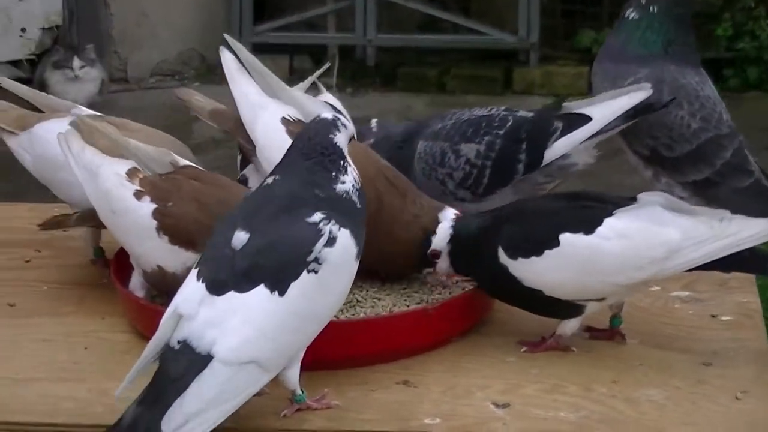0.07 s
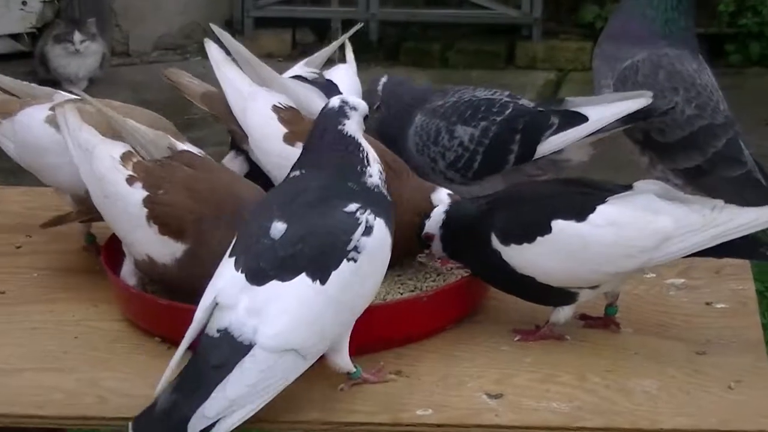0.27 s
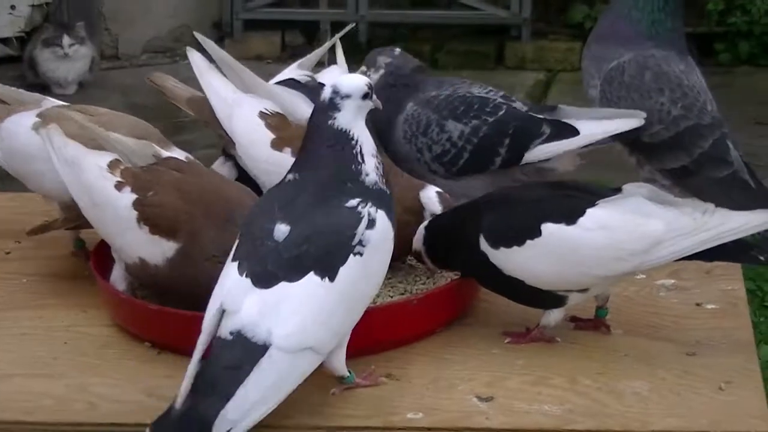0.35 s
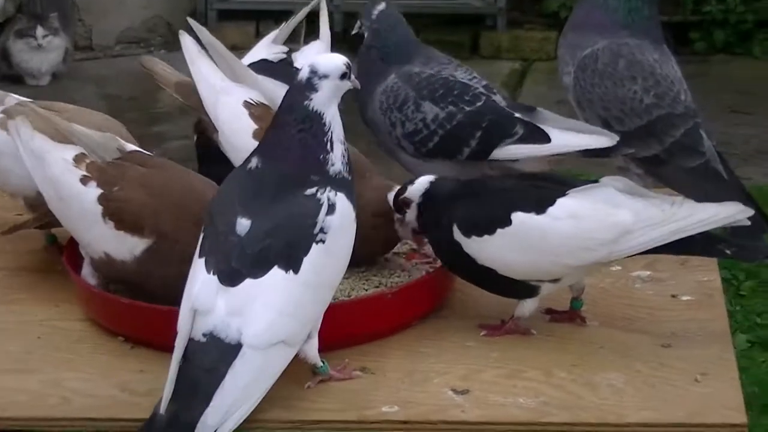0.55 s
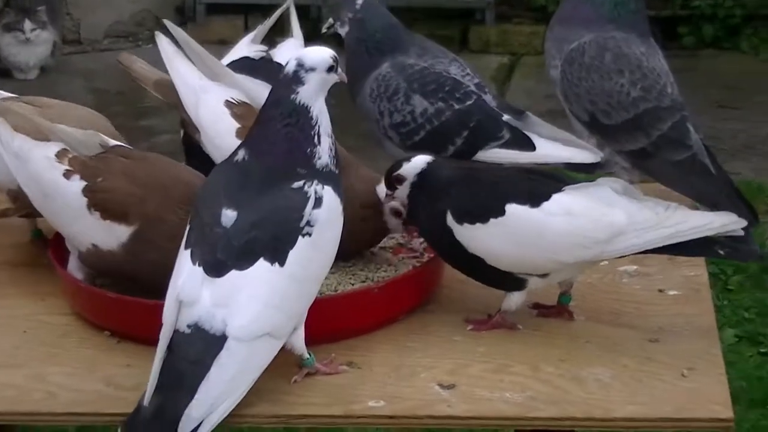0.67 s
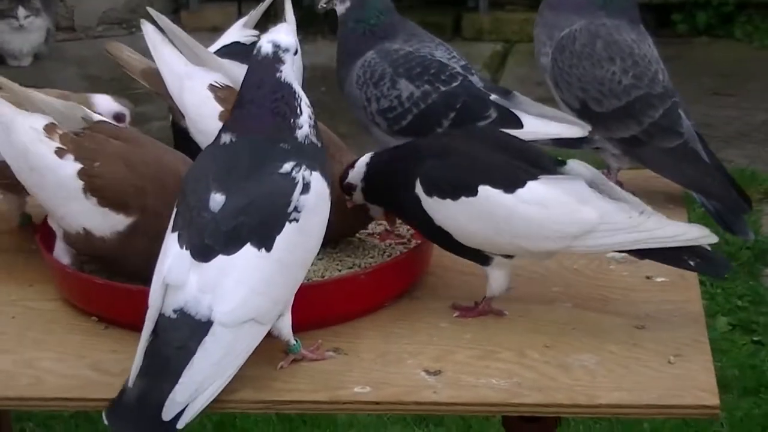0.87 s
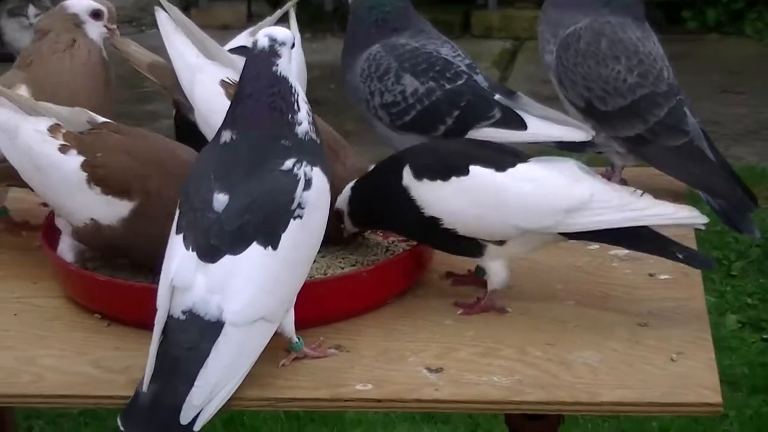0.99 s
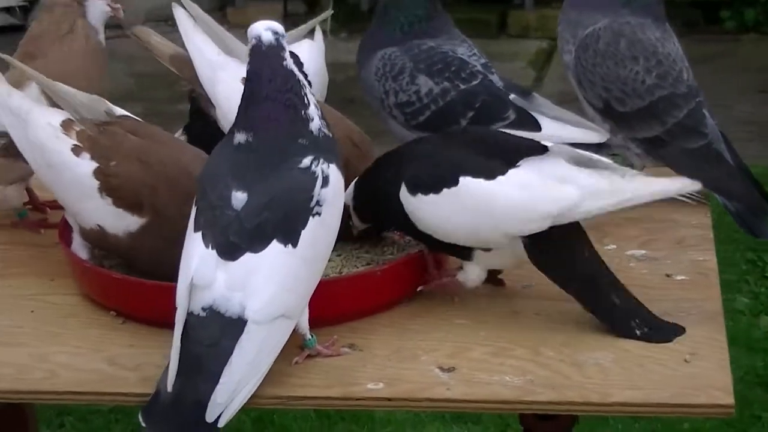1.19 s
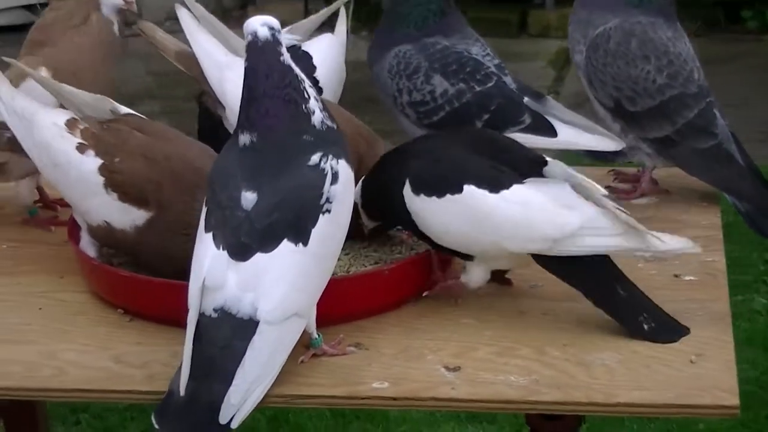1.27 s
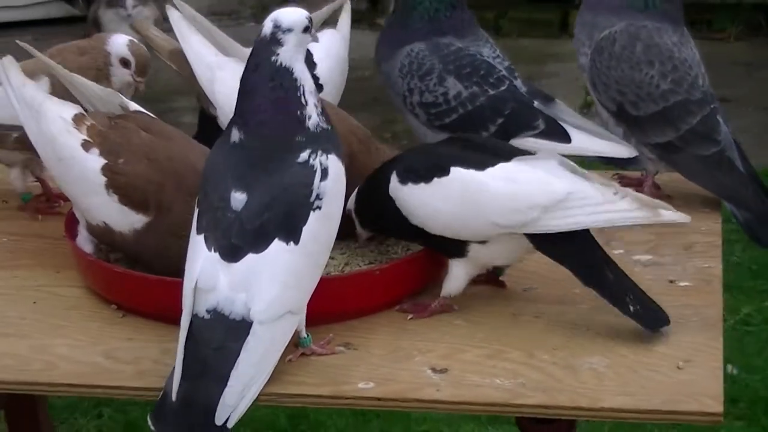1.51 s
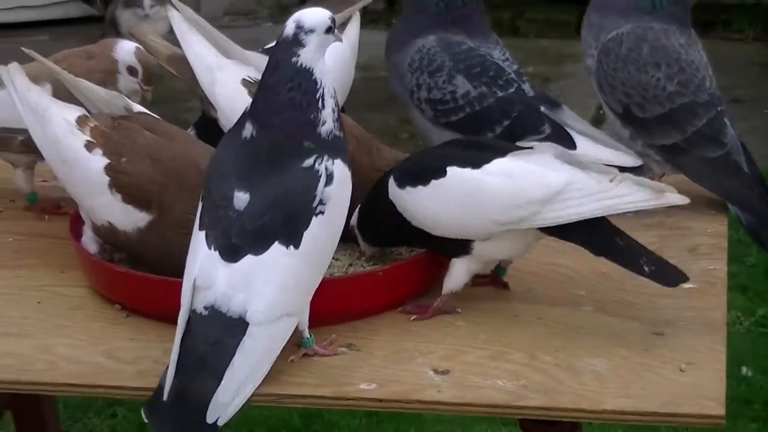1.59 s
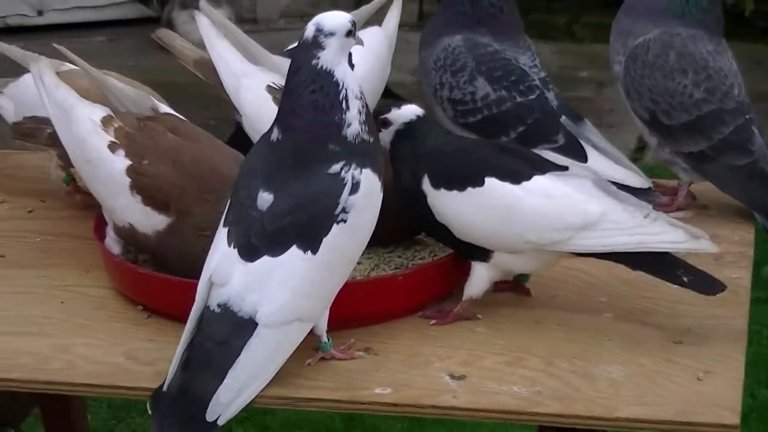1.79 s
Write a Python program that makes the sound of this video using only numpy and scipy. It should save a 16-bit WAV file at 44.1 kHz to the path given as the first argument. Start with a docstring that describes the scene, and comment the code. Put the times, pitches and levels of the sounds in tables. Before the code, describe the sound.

Pigeons peck grain from a plastic dish, with soft thuds, seed clicks and sharp knocks.

```python
"""Pigeons peck grain from a plastic dish on a plywood board, in the hush of a quiet yard.
First beaks thud softly through the grain into the board, and seeds click, slide and rustle.
Near 0.36, 0.97 and 1.29 s a beak knocks sharply on the bare dish and sets its modes ringing;
a flurry of seed clicks follows each time. Soft thuds and clicks go on to the end.
Throughout, the yard returns a faint short echo."""
import sys
import numpy as np
from scipy import signal
from scipy.fft import rfft, irfft
from scipy.io import wavfile

SR = 44100
rng = np.random.default_rng(int(sys.argv[2]) if len(sys.argv) > 2 else 0)


def master(y):
    """Save y as 16-bit WAV."""
    cut = np.clip(np.atleast_2d(y).T, -1, 1)
    pcm = np.round(cut * 32767)  # scale
    wavfile.write(sys.argv[1], SR, pcm.astype(np.int16))


N = 81585
HZ = np.fft.rfftfreq(4096, 1 / SR)  # frequency axis of every pulse spectrum

# Spectrum of the outdoor hush. Each row: frequency in Hz, relative spectral density in dB.
HUSH_SPECTRUM = [(25, -24), (60, -23), (140, -25), (200, -16.5), (300, -10.5), (450, -3), (650, -1),
                 (900, 1), (1350, -2.5), (1900, -2), (2600, -5), (4000, -7.5), (6000, -14.5), (9500, -18),
                 (12000, -27), (15500, -34.5)]
# Likeness of the hush in the two ears. Each row: frequency in Hz, correlation from 0 to 1.
HUSH_CORRELATION = [(50, 0), (150, 0.3), (400, 0.61), (1000, 0.53), (4000, 0.78), (10000, 1)]
HUSH_DB, HUSH_SWELL_DB = -62, -1.5

# Reverberation of the yard. Each row: frequency in Hz, time to decay by 60 dB in seconds.
YARD_T60 = [(250, 0.22), (900, 0.2), (2500, .2), (6000, 0.16), (14000, 0.048)]
YARD_DB, YARD_WIDTH, BOARD_ECHO_DB = -16.5, 0.26, 3
SIDE_DB, SIDE_DELAY_S = -20.5, .0006

# Grain sliding under beaks and feet. Each row: start in seconds, length in seconds, level in dB,
# centre frequency in Hz.
GRAIN_SLIDES = [(0.054, 0.023, -56, 4460), (.075, 0.08, -63.5, 3200), (0.194, .03, -47.5, 3900),
                (0.306, 0.044, -56, 5400), (0.434, .016, -60, 6000), (0.476, .035, -57, 3500),
                (0.522, .02, -54, 2000), (0.615, 0.022, -61.5, 5000), (0.778, 0.028, -64.5, 6000),
                (0.809, .05, -50, 3900), (0.864, 0.037, -53.5, 4870), (0.979, 0.043, -55, 4000),
                (1.040, 0.028, -47, 4200), (1.065, 0.012, -51, 9000), (1.089, 0.058, -59.5, 4500),
                (1.14, 0.034, -59, 4500), (1.178, 0.069, -61, 5000), (1.3, 0.034, -43, 3160),
                (1.43, 0.027, -59, 4460), (1.577, 0.031, -55, 5000), (1.641, 0.019, -55, 4540),
                (1.698, 0.043, -62, 6000), (1.79, 0.014, -59, 5500)]
RUSTLE_OCTAVES, GRAINS_PER_S, GRAIN_SPREAD_DB = 0.95, 3500, 5
STIR_PER_S, STIR_DB, STIR_HZ = 130, -72.5, 6000  # stray seeds shifting all the time

# Skids of a beak or claw. Each row: start in seconds, length in seconds, level in dB,
# resonance in Hz, half-width of the resonance in Hz.
SKID_STROKES = [(.086, 0.015, -57, 7160, 2200), (0.093, 0.023, -53.5, 6700, 2400),
                (.362, 0.028, -48, 2230, 450), (0.367, .03, -43.5, 3300, 450),
                (0.388, 0.036, -50, 3300, 400), (1.306, .045, -52, 2280, 650),
                (1.512, 0.027, -53.5, 7400, 2000), (1.517, .018, -58, 4480, 250),
                (1.590, .028, -65, 8900, 300)]
SLIPS_PER_S = 14000

# Single seeds snapped up or dropped. Each row: start in seconds, level in dB, centre frequency in Hz.
SEED_CLICKS = [(.0417, -53, 7000), (.0540, -36.5, 3977), (.1715, -33, 6940), (.1740, -46, 6000),
               (0.1964, -26.5, 8800), (0.201, -34, 7500), (0.2078, -35, 5500), (0.367, -29, 4470),
               (0.3714, -31, 7000), (.3742, -34, 8000), (0.393, -32.5, 8400), (0.458, -40, 7000),
               (0.5194, -25, 6740), (0.5202, -25.5, 4560), (0.524, -35, 7000), (0.618, -42, 7000),
               (.6367, -37.5, 10000), (.8165, -47, 6000), (.8228, -42, 10000), (.8305, -37, 6000),
               (.8328, -33, 5470), (.8390, -38, 7000), (.8760, -38.5, 6700), (.8933, -32.5, 5340),
               (.9658, -41, 12000), (0.9737, -18, 6000), (0.9769, -17.5, 7500), (0.978, -11, 7800),
               (0.9767, -28, 5450), (0.981, -25.5, 4970), (.9854, -28, 6500), (1.003, -40, 6500),
               (1.0412, -31.5, 6100), (1.078, -43, 9000), (1.0920, -28.5, 9000), (1.0930, -29.5, 6000),
               (1.1035, -29.5, 5470), (1.1195, -44, 9000), (1.1552, -42, 8500), (1.2982, -28, 8000),
               (1.302, -26, 7100), (1.3048, -17.5, 8300), (1.3044, -37, 5470), (1.309, -33, 5000),
               (1.3130, -29, 6000), (1.323, -31, 6600), (1.4627, -38, 6350), (1.5815, -31.5, 9100),
               (1.6362, -43, 6500), (1.6408, -34, 6000), (1.6510, -29, 6500), (1.6537, -38, 7500),
               (1.6927, -37, 6000), (1.7005, -31, 5500), (1.7565, -44, 7500), (1.793, -46, 8040),
               (1.821, -44, 8000), (1.8381, -39, 6500), (1.8427, -34.5, 7000)]
SEED_OCTAVES, SEED_RING_S, SEED_RING_SHARE, SEED_TOP_HZ = 0.79, 0.0012, 0.66, 12000

# Response of the plywood to a blow. Each row: frequency in Hz, relative level in dB.
BOARD_SPECTRUM = [(60, -38), (150, -26), (260, -11), (450, -5.5), (680, 1.5), (1000, 1), (1400, -5.5),
                  (2100, -5), (3500, -18), (8000, -41), (16000, -55)]
# Pecks through the grain into the board. Each row: start in seconds, level in dB, spectral tilt in dB
# per octave, pitch of the struck spot in Hz, level of its ring relative to the peck in dB.
BOARD_PECKS = [(.0520, -39, -.5, 862, -8), (.1445, -51, 1, 940, -8), (.1586, -43.5, 1, 740, -9),
               (.1750, -41, 3.5, 605, -10), (.214, -40, 1.5, 752, -9), (.4209, -30, -.5, 1030, -12),
               (.4345, -47, -1.5, 860, -8), (.4790, -44, .5, 880, -8), (.4875, -45, 1.5, 915, -8),
               (.5225, -38.5, 1.5, 852, -6), (.5285, -45, -3, 852, -7), (.6233, -44.5, -1, 900, -6),
               (.7526, -42, -.5, 1080, -8), (.8227, -42.5, 6, 720, -10), (.8290, -40, -1.5, 760, -8),
               (.8805, -41.5, -1, 1050, -10), (.8885, -44, 2, 870, -8), (.9681, -45, .5, 850, -8),
               (.9785, -38, .5, 800, -4), (1.0940, -40.5, 2, 730, -9), (1.1090, -41.5, 1.5, 900, -7),
               (1.137, -42.5, 3, 637, -8), (1.1512, -39.5, .5, 598, -9), (1.2904, -39, -2, 683, -10),
               (1.4306, -48.5, -.5, 1110, -8), (1.4440, -44.5, -.5, 567, -8), (1.4960, -44, -6.5, 610, -8),
               (1.5828, -35.5, -1, 920, -8), (1.6430, -44, 0, 870, -8), (1.6570, -45.5, 5.5, 1870, -6),
               (1.6860, -51, -2, 650, -8), (1.7092, -44, -.5, 970, -8), (1.7955, -43.5, 2, 1610, -4),
               (1.8005, -43, -4, 703, -8)]
BOARD_RING_S, BOARD_RING_SHARE, BOARD_SPREAD_S = 0.0058, 0.88, 0.0024
FOCUS_DB, FOCUS_OCTAVES = 4, .33  # emphasis around the pitch of the struck spot
FIRM_DB, FIRM_SLOPE = -39, .8  # firmer pecks press through the grain and rattle less (dB per dB)
SPOT_T60_S, PLANK_HZ, PLANK_DB, PLANK_T60_S = 0.047, 273, -24, .06
CRUNCH_DB, CRUNCH_HZ, CRUNCH_TOP_HZ, CRUNCH_S = -17, 1900, 4000, 0.015
LEAD_S = .004  # room for the treble of a bending wave to arrive early

# Modes of the plastic dish. Each row: frequency in Hz at pitch factor 1, time to decay by 60 dB in
# seconds, then relative level in dB when struck on the floor, on the wall and on the rim.
DISH_MODES = [(1448, .014, -30, -24, -18), (1779, .0156, -26, -8, -19), (2128, .0127, 0, -3, 0),
              (2097, .073, -26, -25, -28), (2460, .0072, -17, -27, 0), (2798, .0106, -4, -1, -6),
              (3281, .0112, -11, 0, -8), (3410, .045, -25, -27, -32), (3826, .0115, -11, -21, -6),
              (4360, .0128, -23, -7, -29)]
# Beak on the bare dish. Each row: start in seconds, level in dB, place struck, pitch factor, level of
# the tick relative to the knock in dB, upper cutoff of the ring in Hz, bending spread in seconds.
DISH_KNOCKS = [(.3577, -14.5, "floor", .995, -6, 3800, .0004), (.3866, -41, "rim", .96, -20, 3700, .0008),
               (.3896, -27.5, "floor", 1.1, -20, 3700, .00085), (.9651, -37, "wall", .99, -22, 4000, .002),
               (.967, -18, "wall", .99, -14, 4300, .0012), (1.2885, -33, "rim", 1.05, -18, 4300, .002),
               (1.2897, -17.5, "rim", 1.053, -11, 4400, .0025), (1.3137, -36, "rim", .88, -16, 3970, .0019)]
DISH_LOW_HZ, TICK_HZ, TICK_TOP_HZ, TICK_RING_S, TICK_RING_SHARE = 900, 8450, 13300, 0.0021, 1.46

# Microphone response applied to the pecking. Each row: frequency in Hz, gain in dB.
MIC_RESPONSE = [(40, -30), (130, -23.5), (260, -11), (600, -3.5), (5000, -0.5), (9800, -2), (11500, -8),
                (13500, -15.5), (16000, -11)]
BOARD_LEFT_DB, DISH_LEFT_DB, SEED_LEFT_DB, HUSH_LEFT_DB = 2, 1.65, 0.6, 0.7
BAND_LIMIT_HZ = 15900


def amp(db):
    """Amplitude grows tenfold with every 20 dB."""
    return 10 ** (np.asarray(db) / 20)


def unit(x):
    """Normalisation to an rms of 1."""
    return x / np.sqrt(np.mean(x ** 2) + 1e-20)


def curve(points, hz):
    """Interpolation of a table on a logarithmic frequency axis."""
    f, value = np.transpose(points)
    return np.interp(np.log(hz + 1), np.log(f), value)


def add(mix, start_s, sound):
    """Superposition: a sound adds to the mix from its start time on."""
    part = mix[max(round(start_s * SR), 0):][:len(sound)]
    part += sound[:len(part)]


def pan(x, left_db):
    """A level difference between the ears leans a sound to the left."""
    return x * amp([[left_db / 2], [-left_db / 2]])


def butterworth(x, hz, kind, order):
    """A low-pass or high-pass with a maximally flat passband."""
    return signal.sosfilt(signal.butter(order, hz, kind, fs=SR, output="sos"), x)


def pulse(spectrum_db):
    """Minimum phase: the most compact causal pulse with this spectrum."""
    log_gain = np.log(amp(np.maximum(spectrum_db, -100)))
    mirrored = np.concatenate([log_gain, log_gain[-2:0:-1]])
    return np.fft.ifft(np.exp(np.conj(signal.hilbert(mirrored)))).real


def hump(hz, octaves):
    """A broad band-pass spectrum in dB, with an added roll-off in the far bass."""
    detuning = np.log2((HZ + 1) / hz) / octaves
    bass_loss_db = 20 * np.log10(1 + (hz / 10 / (HZ + 1)) ** 2)
    return -20 * np.log10(1 + detuning ** 2 / 2) - bass_loss_db


def scatter(blow, ring_s, share):
    """Dense resonances act as decaying noise; they follow a blow of peak 1 at `share` times its rms."""
    t = np.arange(len(blow)) / SR
    envelope = np.exp(-t / ring_s) - np.exp(-4 * t / ring_s)
    cloud = signal.fftconvolve(blow, rng.standard_normal(len(t)) * envelope)[:len(t)]
    cloud -= blow * (cloud @ blow) / (blow @ blow)  # uncorrelated with the blow
    cloud *= share * np.linalg.norm(blow) / np.linalg.norm(cloud)
    return (blow + cloud) / abs(blow).max()


def disperse(x, spread_s, on_time_hz):
    """Dispersion: bending waves carry treble faster than bass; on_time_hz is delayed by LEAD_S."""
    delay_s = LEAD_S + spread_s * (np.sqrt(1000 / np.maximum(HZ, 100)) - np.sqrt(1000 / on_time_hz))
    return irfft(rfft(x) * np.exp(-2j * np.pi * np.cumsum(delay_s) * HZ[1]))


def impacts(size, per_s):
    """A Poisson process: independent tiny impacts of uneven strength."""
    occurs = rng.random(size) < per_s / SR
    strength_db = GRAIN_SPREAD_DB * np.minimum(rng.exponential(1, size), 3)
    return occurs * rng.choice([-1, 1], size) * amp(strength_db)


def shower(length_s, spectrum_db, per_s):
    """Shot noise: impacts of one spectrum merge, swelling quickly and fading more slowly."""
    progress = np.linspace(0, 1, int(length_s * SR))
    crest = .3
    envelope = np.minimum(np.sqrt(progress / crest), ((1 - progress) / (1 - crest)) ** 1.36)
    noise = signal.fftconvolve(impacts(8192, per_s), pulse(spectrum_db))
    return envelope * unit(noise[:len(envelope)])


def hush():
    """Partial coherence: distant outdoor noise, wavering slightly, is least alike in the bass."""
    hz, t = np.fft.rfftfreq(N, 1 / SR), np.arange(N) / SR
    left, independent = rfft(rng.standard_normal((2, N)))
    alike = curve(HUSH_CORRELATION, hz)
    right = alike * left + np.sqrt(1 - alike ** 2) * independent
    air = irfft(np.array([left, right]) * amp(curve(HUSH_SPECTRUM, hz)), N)
    swell = sum(np.sin(2 * np.pi * (f * t + rng.random())) / np.sqrt(f) for f in np.geomspace(2, 30, 20))
    return amp(HUSH_DB + HUSH_SWELL_DB * unit(swell)) * unit(air)


def yard_echo(x):
    """Diffuse reverberation: a faint tail decays exponentially, the treble first."""
    mid, side = rng.standard_normal((2, SR // 2))
    noise = np.array([mid + YARD_WIDTH * side, mid - YARD_WIDTH * side])
    hz, t, bands = signal.stft(noise, SR, nperseg=256)
    decay = amp(-60 * t / curve(YARD_T60, hz)[:, None])
    tail = signal.istft(bands * decay, SR, nperseg=256)[1]
    tail *= np.minimum(np.arange(tail.shape[1]) / SR / 0.0032, 1)  # builds up in 3.2 ms
    return amp(YARD_DB) * signal.fftconvolve(x, tail / np.linalg.norm(tail[0]), axes=1)[:, :N]


def grain_width(x):
    """Decorrelation: a faint delayed copy, opposite in sign at the two ears, widens the seed sounds."""
    out = np.zeros(N)
    add(out, SIDE_DELAY_S, amp(SIDE_DB) * x)
    return np.array([out, -out])


def grain_rustle():
    """Granular flow: sliding seeds collide in showers, over a thin steady stirring."""
    click = scatter(pulse(hump(STIR_HZ, RUSTLE_OCTAVES)), SEED_RING_S, SEED_RING_SHARE)
    out = amp(STIR_DB) * unit(signal.fftconvolve(impacts(N, STIR_PER_S), click)[:N])
    for start_s, length_s, db, hz in GRAIN_SLIDES:
        add(out, start_s, amp(db) * shower(length_s, hump(hz, RUSTLE_OCTAVES), GRAINS_PER_S))
    return out


def skids():
    """Stick-slip friction: rapid slips of a beak or claw excite one resonance."""
    out = np.zeros(N)
    for start_s, length_s, db, hz, half_width_hz in SKID_STROKES:
        resonance_db = -20 * np.log10(1 + ((HZ - hz) / half_width_hz) ** 4)
        add(out, start_s, amp(db) * shower(length_s, resonance_db, SLIPS_PER_S))
    return out


def seed_clicks():
    """Brief contact gives a broad, high spectrum: hard seeds click against beaks and one another."""
    out = np.zeros(N)
    for start_s, db, hz in SEED_CLICKS:
        click = scatter(pulse(hump(hz, SEED_OCTAVES)), SEED_RING_S, SEED_RING_SHARE)
        add(out, start_s, amp(db) * click)
    return out


def board_thuds():
    """Cushioned impact: a peck crunches grain and sends bending waves through briefly ringing plywood."""
    out, t = np.zeros(N), np.arange(4096) / SR
    for start_s, db, tilt_db, spot_hz, spot_db in BOARD_PECKS:
        brightness_db = tilt_db * np.log2(np.clip(HZ, 300, 5000) / 1000)
        focus_db = FOCUS_DB * np.exp(-(np.log2((HZ + 1) / spot_hz) / FOCUS_OCTAVES) ** 2)
        blow = pulse(curve(BOARD_SPECTRUM, HZ) + brightness_db + focus_db)
        blow = disperse(blow, BOARD_SPREAD_S, on_time_hz=1000)
        rattle_share = BOARD_RING_SHARE * amp(-FIRM_SLOPE * max(db - FIRM_DB, 0))
        add(out, start_s - LEAD_S, amp(db) * scatter(blow, BOARD_RING_S, rattle_share))
        spot = amp(spot_db - 60 * t / SPOT_T60_S) * np.sin(2 * np.pi * spot_hz * t)
        plank = amp(PLANK_DB - 60 * t / PLANK_T60_S) * np.sin(2 * np.pi * PLANK_HZ * t)
        add(out, start_s, amp(db) * (spot + plank) * np.minimum(t / .003, 1))  # 3 ms attack
        crunch = shower(CRUNCH_S, hump(CRUNCH_HZ, RUSTLE_OCTAVES), GRAINS_PER_S)
        crunch = butterworth(crunch, CRUNCH_TOP_HZ, "low", order=2)
        add(out, start_s - LEAD_S, amp(db + CRUNCH_DB + tilt_db) * crunch)
    return out


def dish_knocks():
    """Modal vibration: a beak ticks on the dish, and the place struck weights its damped modes."""
    out, t = np.zeros(N), np.arange(4096) / SR
    for start_s, db, place, pitch, tick_db, top_hz, spread_s in DISH_KNOCKS:
        column = ["floor", "wall", "rim"].index(place)
        ring = sum(amp(mode_db[column] - 60 * t / t60) * np.cos(2 * np.pi * hz * pitch * t)
                   for hz, t60, *mode_db in DISH_MODES)
        ring = butterworth(ring, top_hz, "low", order=12)  # the contact excites little above this
        ring = butterworth(ring, DISH_LOW_HZ, "high", order=4)
        ring = disperse(ring, spread_s, on_time_hz=3000)
        tick = scatter(pulse(hump(TICK_HZ, SEED_OCTAVES)), TICK_RING_S, TICK_RING_SHARE)
        tick = butterworth(tick, TICK_TOP_HZ, "low", order=2)
        add(out, start_s - LEAD_S, amp(db) * ring / abs(ring).max())
        add(out, start_s, amp(db + tick_db) * tick)
    return out


def scene():
    """Superposition: direct pecking and its echo, coloured by the microphone, add to the hush."""
    wood = pan(board_thuds(), BOARD_LEFT_DB)
    grain = butterworth(seed_clicks() + grain_rustle() + skids(), SEED_TOP_HZ, "low", order=3)
    dish_and_grain = pan(dish_knocks(), DISH_LEFT_DB) + pan(grain, SEED_LEFT_DB) + grain_width(grain)
    echo = yard_echo(dish_and_grain + amp(BOARD_ECHO_DB) * wood)
    microphone = pulse(curve(MIC_RESPONSE, HZ))[None]
    pecking = signal.fftconvolve(wood + dish_and_grain + echo, microphone, axes=1)[:, :N]
    return pecking + pan(hush(), HUSH_LEFT_DB)


def record(dry):
    """Band limiting: a steep linear-phase low-pass removes the highest treble."""
    low_pass = signal.firwin(511, BAND_LIMIT_HZ, window=("kaiser", 9), fs=SR)
    return signal.oaconvolve(dry, low_pass[None], "same")


dry = scene()
out = record(dry)
master(out)
```